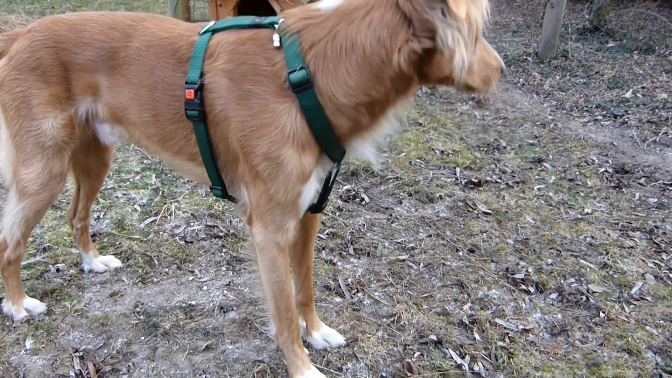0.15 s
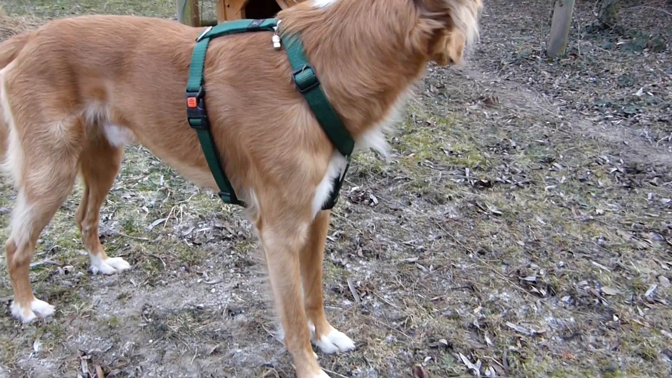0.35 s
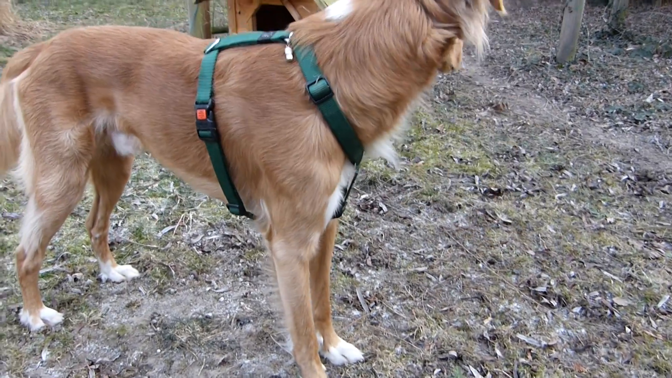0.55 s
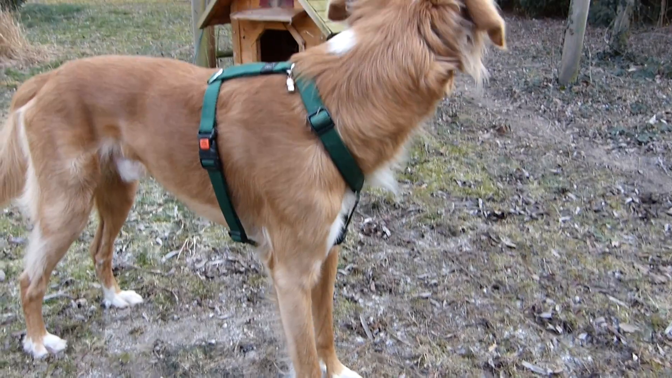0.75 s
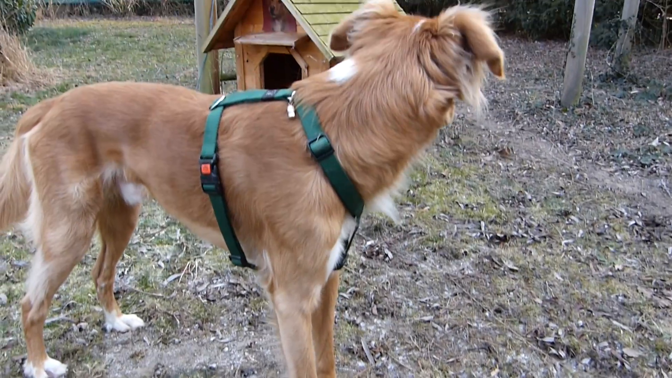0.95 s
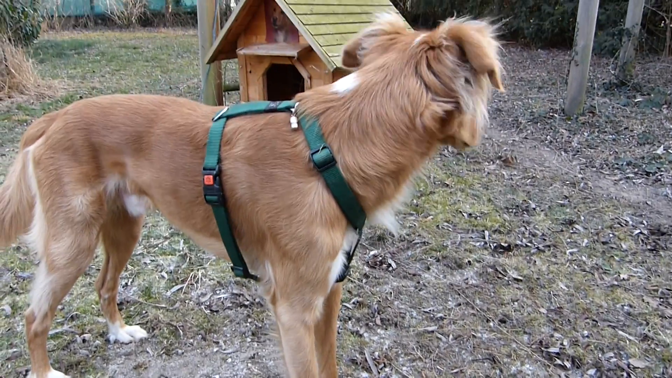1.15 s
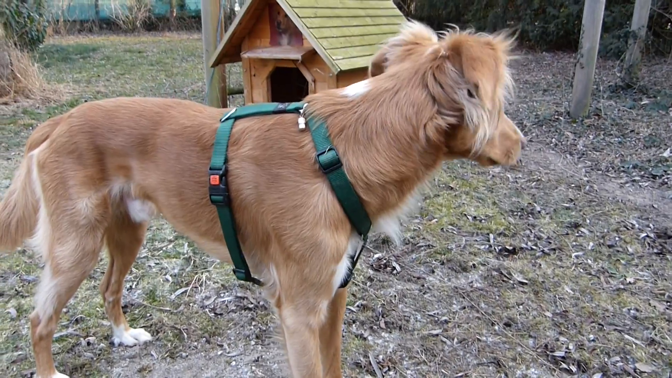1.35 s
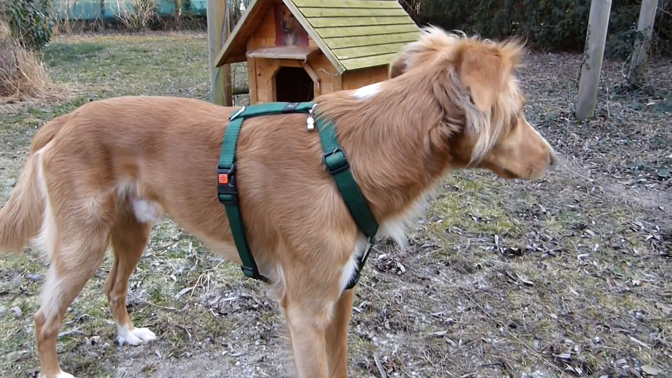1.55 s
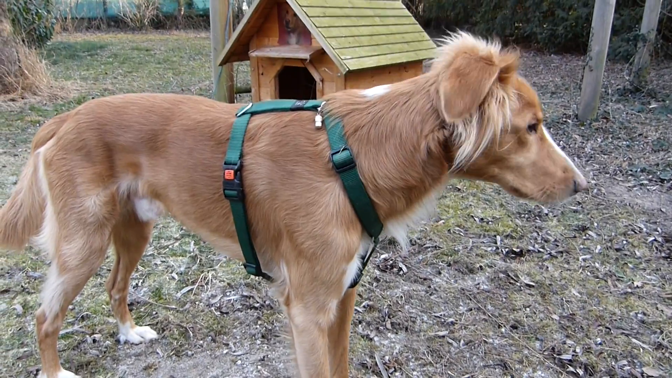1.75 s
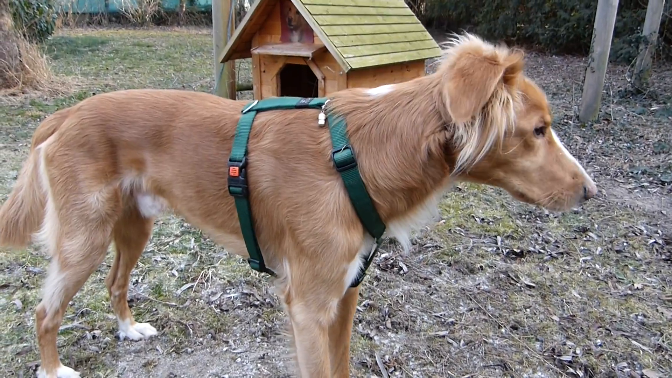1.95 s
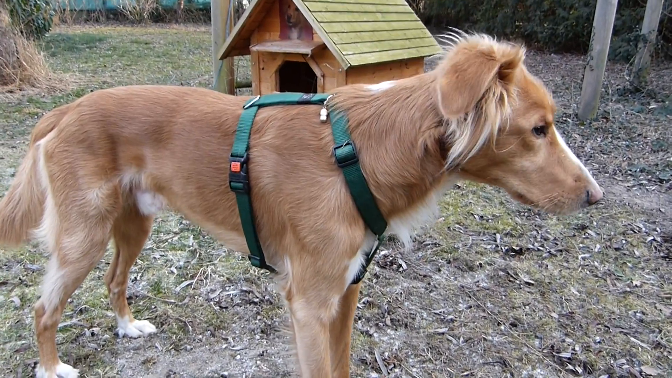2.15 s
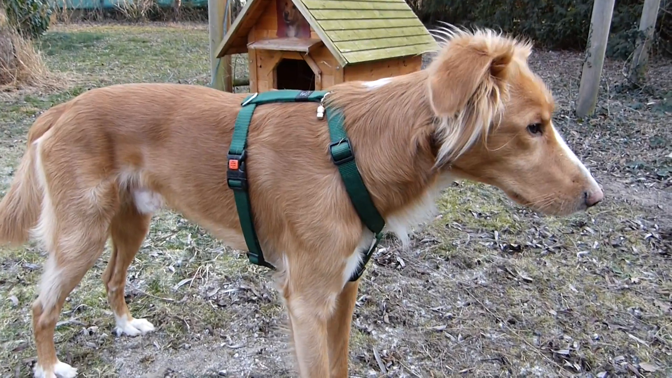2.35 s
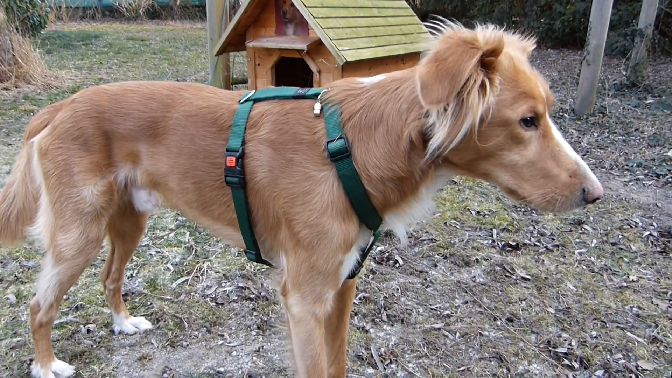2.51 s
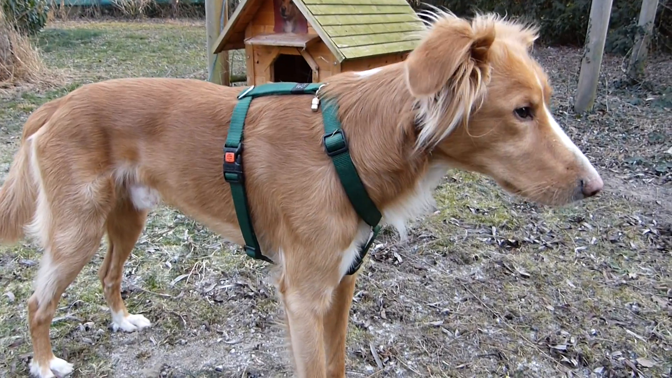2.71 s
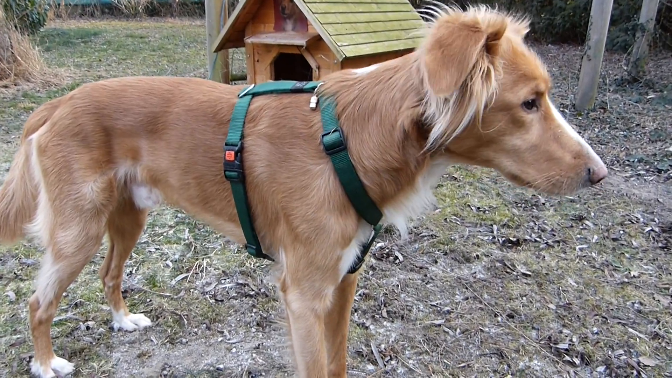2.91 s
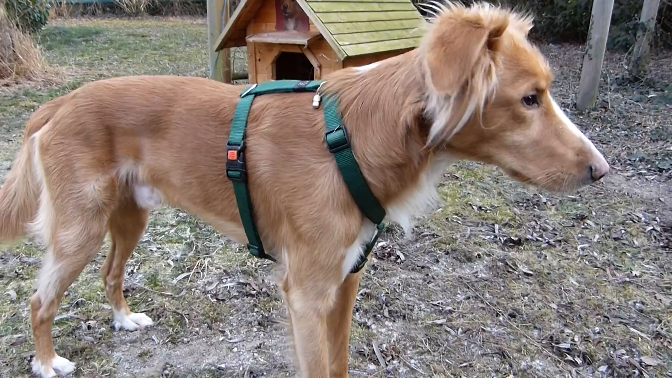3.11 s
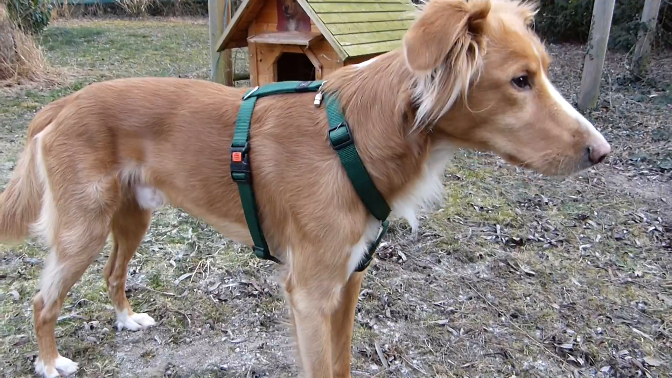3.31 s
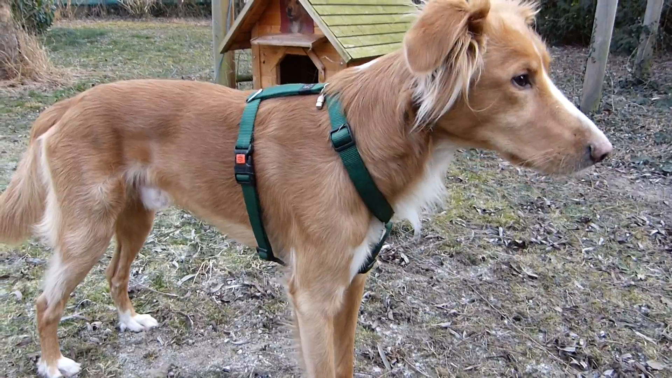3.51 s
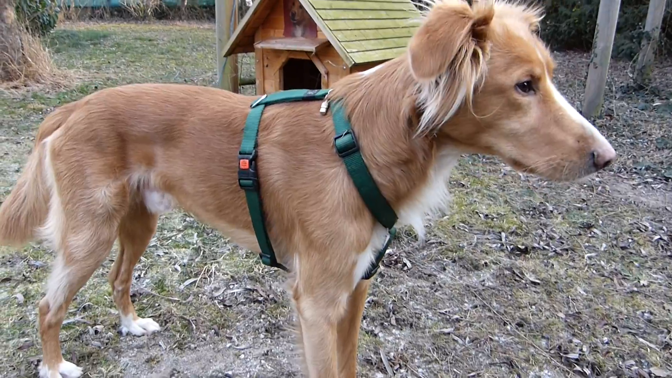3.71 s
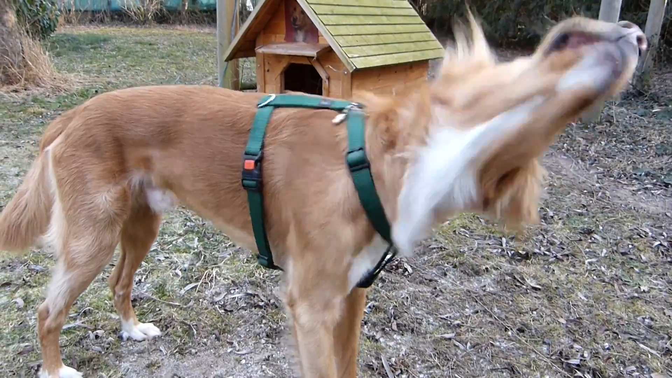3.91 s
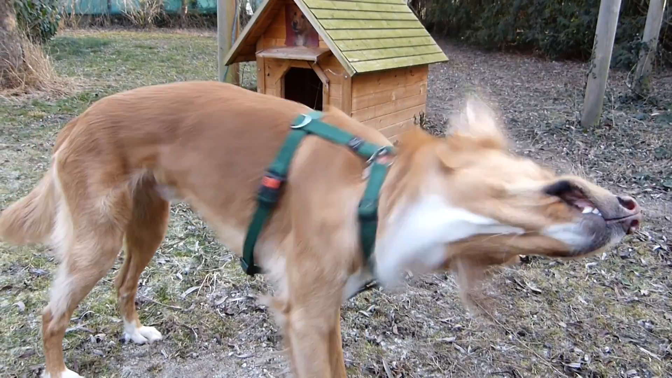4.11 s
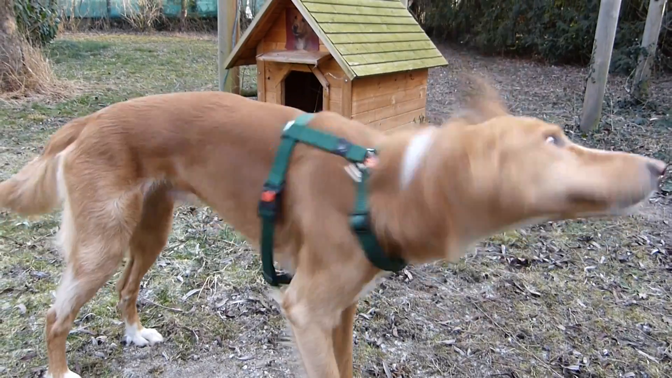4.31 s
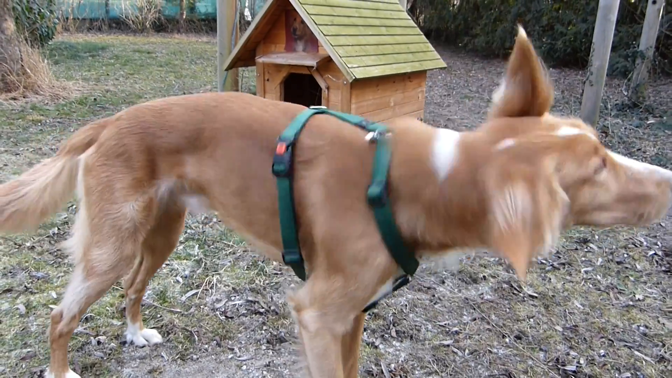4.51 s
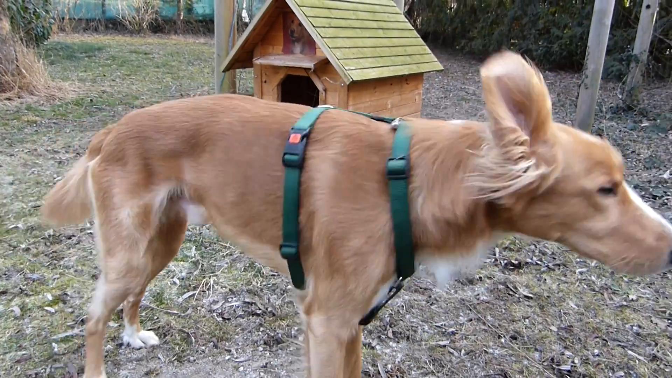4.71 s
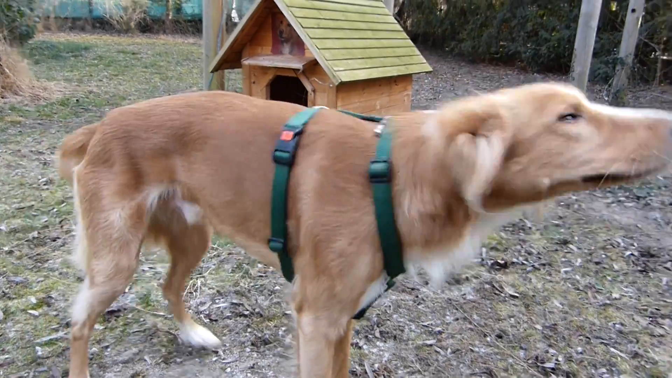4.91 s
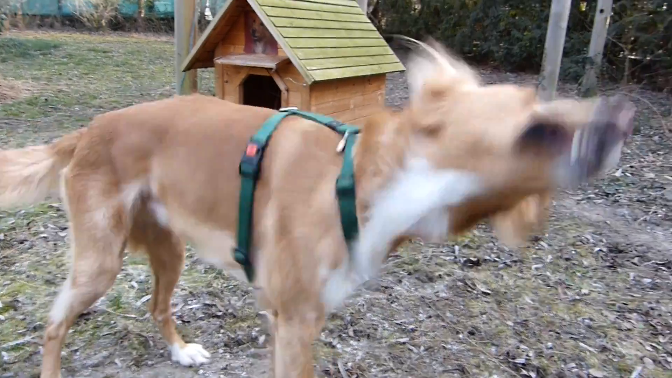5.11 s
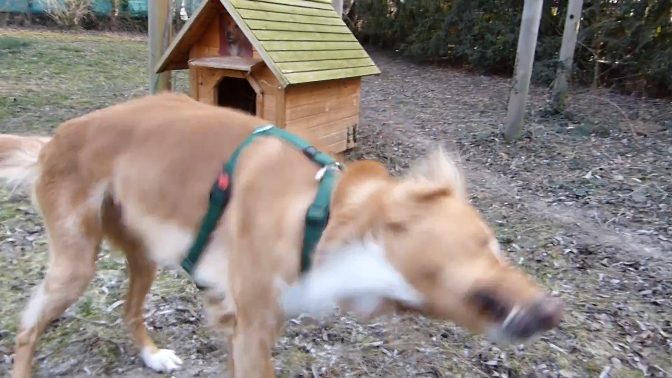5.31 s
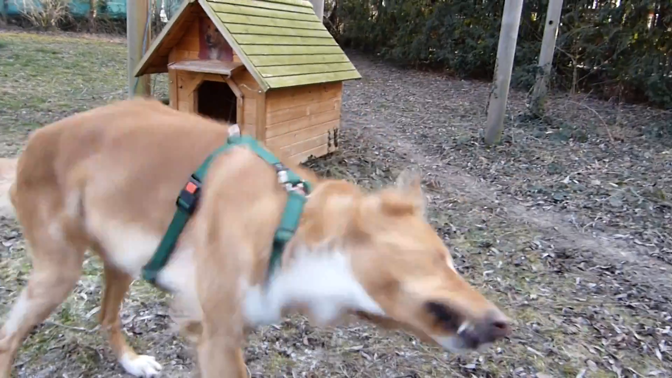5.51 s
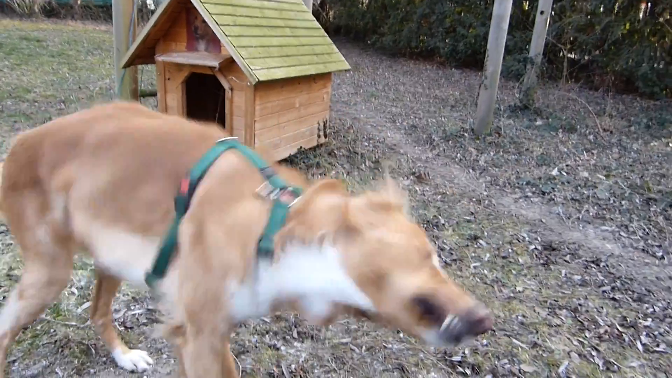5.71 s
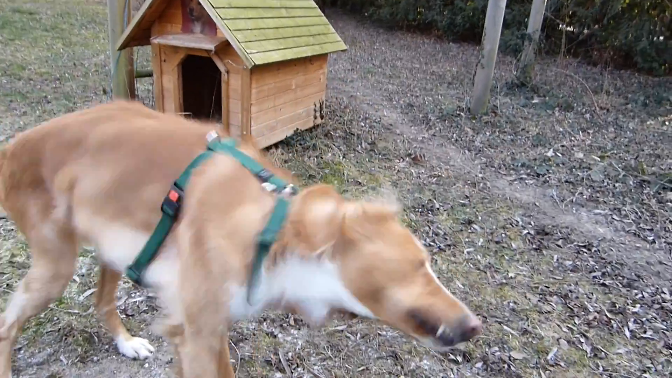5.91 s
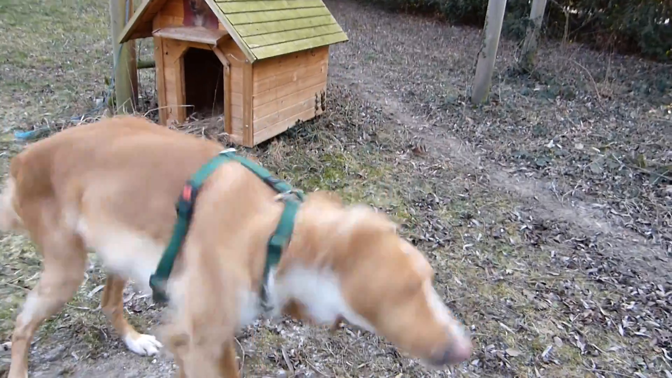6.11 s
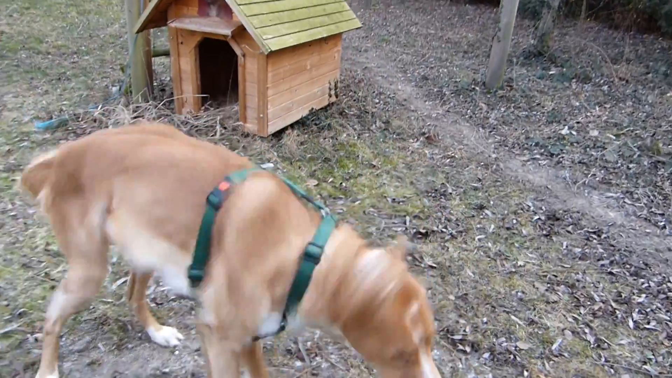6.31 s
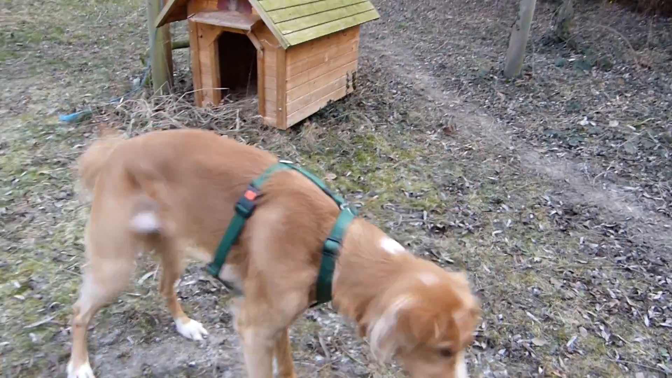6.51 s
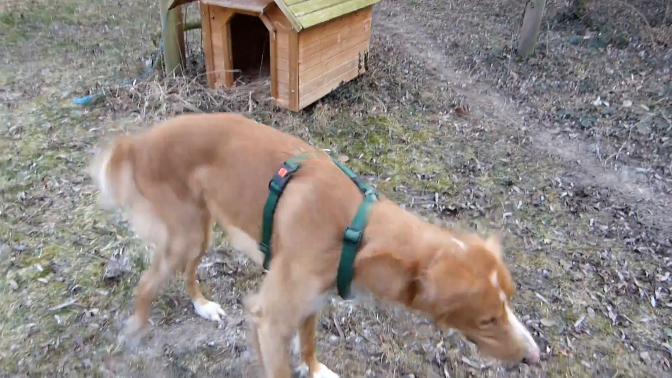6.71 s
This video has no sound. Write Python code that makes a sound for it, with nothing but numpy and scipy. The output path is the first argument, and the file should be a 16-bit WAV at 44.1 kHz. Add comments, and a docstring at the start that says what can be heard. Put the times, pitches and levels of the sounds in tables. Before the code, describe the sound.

A dog's ears flap in rapid leathery slaps, first a short burst, then a longer one with swishing coat, steel jingle, clicks and soft paw thuds.

```python
"""Far traffic murmurs behind a garden, and a hand rubs on a hard case: tiny slips excite its resonances.
Then a harnessed dog shakes its head briefly, and after a pause its whole body, its coat swishing as noise.
Its ears slap as damped air modes, about ten a second in the long shake, each with a thump, pop and crack.
The steel leash ring jingles as struck decaying modes, and the buckles click as short resonant noise.
Paws land on the earth as soft low thuds near the end."""
import sys
import numpy as np
from scipy import signal
from scipy.fft import rfft, irfft
from scipy.io import wavfile
from scipy.ndimage import uniform_filter1d

SR = 44100
rng = np.random.default_rng(int(sys.argv[2]) if len(sys.argv) > 2 else 0)


def wav_record(signal):
    """Record a signal, one row per channel, as 16-bit PCM in the file named by sys.argv[1]."""
    frames = np.transpose(np.atleast_2d(signal))
    bounded = np.clip(frames, -1, 1)
    # unit amplitude maps onto the largest positive 16-bit level
    quanta = np.round(bounded * 32767).astype(np.int16)
    wavfile.write(sys.argv[1], SR, quanta)


N = 297807
T = np.arange(N) / SR  # time in s
CREST_S = .014  # delay from the start of a noise burst to its crest
EDGE_HZ = 16000  # upper band limit

# Garden background. Each row: time in seconds, level in dB.
GARDEN_LEVEL = [(0, -55.5), (2.2, -56), (2.9, -58.5), (3.8, -55.5), (6.75, -55)]
# Spectrum of the garden air. Each row: frequency in Hz, relative level in dB.
GARDEN_SPECTRUM = [(25, -23), (100, -11.5), (140, -9), (220, -10), (350, -9.5), (530, -8), (800, -2.5),
                   (1100, -4.5), (1650, -9.5), (2400, -17), (3300, -19), (6900, -15), (16000, -34.5)]
# Stereo widths of garden, case and coat. Each row: frequency in Hz, side over middle in dB.
GARDEN_WIDTH = [(100, -9.5), (300, 5), (700, 1.5), (2500, -2), (6000, -5.5)]
CASE_WIDTH = [(70, -3), (300, 29), (900, 7.5), (1700, -7), (4000, -1.5)]
COAT_WIDTH = [(100, -23), (300, -14), (1000, -8), (10000, -9.5)]

# Strokes of the hand on the case. Each row: start in seconds, end in seconds, relative level in dB.
RUBS = [(0.226, 0.34, -53), (0.648, 0.978, -55), (0.933, 1.046, -50), (1.062, 1.088, -55),
        (1.245, 1.298, -58), (1.312, 1.363, -46.5), (1.593, 1.8, -49), (1.818, 1.922, -48),
        (2.025, 2.168, -47.5), (2.15, 2.222, -47)]
# Resonances of the case. Each row: frequency in Hz, relative level in dB.
CASE_SPECTRUM = [(150, -15), (520, -8), (760, 5.5), (1100, 2), (1550, -9), (1880, 2), (2250, -4.5),
                 (2850, -1), (3600, -6.5), (5100, -3), (6200, -5.5), (7100, -2), (10000, -17), (16000, -36)]
# Thin hisses of the hand. Each row: start in seconds, end in seconds, level in dB, resonance in Hz.
THIN_HISSES = [(0.67, 1.054, -59, 7260), (2.036, 2.238, -50.5, 5060)]

# Dry clicks of buckles and fittings. Each row: crest in seconds, level in dB, resonance in Hz.
CLICKS = [(3.8922, -54.5, 3830), (4.0545, -43, 4770), (4.135, -39, 8550), (4.244, -42, 4060),
          (4.494, -41, 3660), (5.3923, -34, 3120), (5.7148, -41, 7400), (5.7275, -23, 11100),
          (6.349, -31, 4220), (6.416, -36, 8850), (6.5073, -36.5, 5140), (6.559, -25, 6700),
          (6.633, -22, 9300), (6.694, -34, 5960)]

# The dog's shakes. Each row: start in seconds, wind-up in seconds, end in seconds,
# relative vigour in dB, tiring in dB per second.
SHAKES = [(3.979, 0.017, 4.82, -50, 14.5), (5.1, 0.14, 6.75, -45.5, 2)]
STOP_S = .06  # decay time as a shake comes to rest
# The body rolls to and fro, flinging the ring once a roll and swishing the coat twice.
ROLL_HZ, FLING_AT_S = 6.7, 5.605
# Single sweeps of hair and webbing. Each row: crest in seconds, level in dB, fade in seconds.
BRUSHES = [(4.76, -58, 0.054), (5.074, -45, 0.041), (6.635, -38, .04)]
# Spectra of the hair and of the duller body rustle. Each row: frequency in Hz, relative level in dB.
FUR_SPECTRUM = [(500, -51), (2000, -27), (3000, 1), (5000, 8.5), (8000, 9), (10000, 4.5), (12000, -5),
                (16000, -16)]
BODY_SPECTRUM = [(40, -34), (130, 0.5), (300, -4), (750, 2), (1500, 2), (2100, -2.5), (3200, -13),
                 (6000, -55)]

# Ear slaps. Each row: landing in seconds, force in dB, extra weight of the flap in dB,
# extra snap of its tip in dB, thump resonance in Hz.
SLAPS = [(4.0631, -39, 3, 3, 414), (4.1182, -46.5, 2, 7, 428), (4.1475, -18, 3, 3.5, 844),
         (4.16, -36, -1, -7, 693), (4.253, -31, 2, -3, 540), (4.39, -26, 3.5, -3.5, 736),
         (4.5129, -46.5, -3.5, -2, 350), (4.7663, -49, -12, -3, 700), (5.1576, -37.5, -4.5, -1, 685),
         (5.25, -37.5, -2, 2, 334), (5.345, -19, -4, 1.5, 430), (5.4384, -28, -2.5, 1.5, 470),
         (5.538, -20.5, -0.5, 1.5, 467), (5.611, -29.5, -10.5, 3, 930), (5.6382, -28.5, 1.5, -1, 547),
         (5.738, -19, 1.5, -3, 590), (5.8374, -29.5, 0.5, 1, 590), (5.9362, -20, 0, -0.5, 620),
         (6.002, -27.5, -12.5, -10, 800), (6.034, -30.5, -5.5, -8, 566), (6.129, -20.5, -0.5, 3, 590),
         (6.2226, -33.5, -5, 2, 600), (6.3182, -18, -2, 1, 586), (6.4146, -44.5, 4, 3, 700)]
# Pitch of the trapped air, which tends to rise as the head drops. Each row: time in seconds, frequency in Hz.
POP_PITCH = [(4.4, 1460), (5.3, 1460), (5.55, 1680), (6.05, 1580), (6.3, 1820)]
# Spectra of thump and crack. Each row: frequency in Hz, relative level in dB.
THUMP_SPECTRUM = [(30, -52), (80, -21), (160, 0), (500, -2.5), (950, 3.5), (1200, -19), (1800, -31),
                  (5000, -67.5)]
CRACK_SPECTRUM = [(800, -31), (2000, -16), (2750, 10.5), (3600, 4.5), (5000, 5.5), (8000, -6.5),
                  (11000, -11.5), (16000, -32)]
# Force of a middling slap; its thump and crack levels, and their growth in dB per dB of force.
USUAL_DB, THUMP_DB, THUMP_GROWTH, CRACK_DB, CRACK_GROWTH = -29, -31, .65, -40.5, 1.1
CRUMPLE = 0.54  # weak slaps slide on: dB more wrinkling for each dB less force

# Blows on the leash ring. Each row: start in seconds, force in dB,
# angle in degrees (0 rings the low modes, 90 the middle ones).
CLINKS = [(4.166, -37.5, 10), (4.213, -38.5, 5.1), (4.23, -41, 4), (4.4281, -38, 12), (4.4366, -37.5, 12),
          (4.45, -38.5, 13), (5.2657, -44.5, 60), (5.4875, -42.5, 50), (5.542, -39, 92), (5.5727, -29, 7.8),
          (5.5895, -27.5, 15), (5.601, -26, 74), (5.6423, -36.5, 35), (5.654, -36.5, 64), (5.806, -33, 16),
          (5.8118, -30, 68), (5.8667, -38.5, 18), (5.9912, -27.5, 4.3), (6.003, -31.5, 13),
          (6.0065, -28, 60), (6.173, -35.5, 16), (6.197, -28.5, 96), (6.1999, -30.5, 34),
          (6.387, -26.5, 75), (6.402, -37.5, 35)]
# Modes of the free ring before random scatter. Each row: group (0 low, 1 middle, 2 high),
# frequency in Hz, relative level in dB, time to fall by 60 dB in seconds.
RING_MODES = [(0, 3956, 3, .06), (0, 4066, 3, 0.092), (1, 6445, -14, 0.062), (1, 6650, -8, 0.025),
              (2, 7480, -6.5, .022), (2, 8460, 1.5, 0.039), (2, 9975, -3.5, .05), (2, 10300, -8.5, .025),
              (2, 15050, -22, 0.042)]
# Spectrum of scraping steel. Each row: frequency in Hz, relative level in dB.
STEEL_SPECTRUM = [(800, -19), (2500, -1), (5000, 1), (10300, 2.5), (12000, -14), (16000, -18)]
# A light touch rings mostly the high modes; deeper ones match them at FIRM_DB, growing in dB per dB.
FIRM_DB, DEEP_GROWTH = -33, 1.51
SCRAPE_GROWTH = .17  # light touches scrape: exponential lengthening of the onset per dB less force

# Soft paw falls. Each row: start of the swell in seconds, level in dB.
PAWS = [(6.515, -40), (6.595, -41.5), (6.724, -40.5), (6.738, -45)]


def amp(db):
    """The decibel law: amplitude grows tenfold in 20 dB."""
    return 10 ** (np.asarray(db) / 20)


def evened(x):
    """Normalises mean power, so that rms is 1."""
    return x / np.sqrt(np.mean(x ** 2) + 1e-20)


def blow(x):
    """Normalises impact energy to that of 10 ms at rms 1."""
    return x / np.sqrt(np.sum(x ** 2) / (SR / 100) + 1e-20)


def read(points, hz):
    """Interpolates a curve over log frequency, as hearing spaces pitch."""
    f, value = np.transpose(points)
    return np.interp(np.log(hz + 1), np.log(f + 1), value)


def add(mix, s, sound):
    """Superposition: adds a sound to the mix from time s."""
    part = mix[max(round(s * SR), 0):][:len(sound)]
    part += sound[:len(part)]


def colour(x, points):
    """Linear filtering: multiplies the spectrum of x by a gain curve."""
    size = x.shape[-1]
    gain = amp(read(points, np.fft.rfftfreq(size, 1 / SR)))
    return irfft(rfft(x) * gain, size)


def burst(rise, fall, size=2048):
    """Transient friction: noise swells exponentially to a crest at CREST_S and dies away."""
    t = np.arange(size) / SR - CREST_S
    return rng.standard_normal(size) * np.exp(np.minimum(t / rise, -t / fall))


def grains(per_s, spread_db):
    """Shot noise: random tiny contacts of uneven size and either sign."""
    size = amp(spread_db * np.minimum(rng.exponential(1, N), 4))
    return size * rng.choice([-1, 1], N) * (rng.random(N) < per_s / SR)


def clumps(depth_db, span_s):
    """Stick and slip: gain flutters at random as tufts and patches catch and let go."""
    wander = evened(uniform_filter1d(rng.standard_normal(N), max(round(span_s * SR), 1)))
    return evened(amp(depth_db * np.clip(wander, -2, 2)))


def air_mode(hz, width_hz, size=1024):
    """Damped resonance: bandwidth sets the decay; differencing removes the steady part."""
    t = np.arange(size) / SR
    swing = np.exp(-np.pi * width_hz * t) * np.sin(2 * np.pi * hz * t)
    return np.diff(swing, prepend=0)


def stereo(x, right_db):
    """Level panning: splits a level difference evenly between left and right."""
    return x * amp(np.array([[-.5], [.5]]) * right_db)


def widen(middle, other, width):
    """Decorrelation: an unrelated like sound enters left and right with opposite signs."""
    return middle + colour(other, width) * np.array([[1], [-1]])


def garden():
    """Diffuse field: far traffic and faint hiss as wide coloured noise of slowly drifting level."""
    middle, other = evened(colour(rng.standard_normal((2, N)), GARDEN_SPECTRUM))
    air = widen(middle, other, GARDEN_WIDTH)
    return air * amp(np.interp(T, *np.transpose(GARDEN_LEVEL)))


def hand(arch=0.83, crest=0.41, case_db=2.5, hiss_width_hz=450):
    """Sliding friction: uneven strokes of skin make tiny slips that excite the case's resonances."""
    def stroke(start, end, db):
        """Level follows the arched speed of one stroke; crest is its fraction of the duration."""
        phase = np.interp(T, [start, start + crest * (end - start), end], [0, .5, 1])
        return amp(db) * abs(np.sin(np.pi * phase)) ** arch

    speed = np.sqrt(sum(stroke(*row) ** 2 for row in RUBS))
    speed = speed * clumps(depth_db=1.46, span_s=0.0064)
    middle, other = (speed * evened(colour(grains(9000, 4.0), CASE_SPECTRUM)) for _ in range(2))
    hiss = np.zeros(N)
    for start, end, db, hz in THIN_HISSES:
        slips = signal.oaconvolve(grains(10000, 3.1), air_mode(hz, hiss_width_hz))[:N]
        hiss += stroke(start, end, db) * evened(slips)
    return amp(case_db) * widen(middle, other, CASE_WIDTH) + hiss


def buckles(peak_db=8):
    """Impact of small stiff parts: short noise clicks, each with one broad resonance."""
    out = np.zeros(N)
    for s, db, hz in CLICKS:
        click = colour(burst(0.00061, 0.0022),
                       [(300, -14), (1500, -22), (4000, 4.5), (9500, 5), (12000, -16), (16000, -20)])
        click = colour(click, [(hz * 0.74, 0), (hz, peak_db), (hz * 1.5, 0)])
        add(out, s - CREST_S, amp(db) * blow(click))
    return stereo(out, right_db=0.5)


def vigour():
    """Driven motion: each shake winds up, tires exponentially and comes to rest."""
    out = np.zeros(N)
    for start, wind_up, end, db, tiring in SHAKES:
        age = np.maximum(T - start, 0)
        rise = 1 - np.exp(-age / wind_up)
        stop = np.exp(-np.maximum(T - end, 0) / STOP_S)
        out += amp(db - tiring * age) * rise * stop
    return out


def coat(swish_db=1.3, chatter_db=-4, fling_db=4, body_db=-12, body_follows=0.77,
         swing_db=1.0, swish_lag_s=0.027, brush_rise_s=.004, travel_s=0.044):
    """Friction of hair on hair and webbing swells twice a roll; the ring chatters at each fling."""
    motion = vigour()
    roll = 2 * np.pi * ROLL_HZ * (T - FLING_AT_S)
    lag = 2 * np.pi * ROLL_HZ * swish_lag_s
    swish = motion * amp(swish_db + swing_db * np.cos(2 * (roll - lag)))
    for s, db, fade in BRUSHES:
        swish = swish + amp(db) * np.exp(np.minimum((T - s) / brush_rise_s, (s - T) / fade))
    # the shake travels from head to trunk
    body = amp(body_db) * np.interp(T - travel_s, T, motion) ** body_follows
    chatter = motion * amp(chatter_db + fling_db * np.cos(roll)) * rattle()

    def rustle():
        """Many tiny contacts add up to noise: bright hair over a duller body."""
        hair = evened(colour(grains(5500, 4.7), FUR_SPECTRUM)) * clumps(depth_db=2.5, span_s=0.012)
        return swish * hair + body * evened(colour(grains(3000, 3.1), BODY_SPECTRUM))

    return widen(rustle() + chatter, rustle(), COAT_WIDTH)


def ears(pop_width_hz=430, thump_width_hz=290, wrinkle=0.58, settle_db=-17, edge_db=-6):
    """Impact excites resonance: an ear lands edge first, with thump, pop and crack; harder is brighter."""
    low, middle, high = np.zeros((3, N))
    for s, force_db, weight_db, snap_db, thump_hz in SLAPS:
        harder_db = force_db - USUAL_DB
        contact = wrinkle * amp(-CRUMPLE * harder_db) * blow(burst(0.0024, 0.004))
        contact = contact + amp(settle_db) * blow(burst(0.0034, 0.01))  # the flap settles
        landing = blow(np.ones(1))
        add(contact, CREST_S, landing)
        edge_lead_s = rng.uniform(0.00076, 0.001855)
        add(contact, CREST_S - edge_lead_s, amp(edge_db) * landing)

        flesh = air_mode(thump_hz, thump_width_hz)  # the flap against the cheek
        pocket = air_mode(np.interp(s, *np.transpose(POP_PITCH)), pop_width_hz)  # trapped air
        thump = colour(signal.fftconvolve(contact, flesh), THUMP_SPECTRUM)
        pop = colour(signal.fftconvolve(contact, pocket), [(2000, 3.5), (2900, -4), (9000, -51)])
        crack = colour(burst(0.001, 0.0019), CRACK_SPECTRUM)  # hair

        thump_db = THUMP_DB + THUMP_GROWTH * harder_db + weight_db
        crack_db = CRACK_DB + CRACK_GROWTH * harder_db + snap_db
        add(low, s - CREST_S, amp(thump_db) * blow(thump))
        add(middle, s - CREST_S, amp(force_db) * blow(pop))
        add(high, s - CREST_S, amp(crack_db) * blow(crack))
    return stereo(low, right_db=3.0) + stereo(middle, right_db=2.5) + high


def ringing(group, size=4096, bend=0.009):
    """Modal decay: a random striking spot scatters levels, and the pull of the webbing bends pitches."""
    t = np.arange(size) / SR
    out = np.zeros(size)
    for g, hz, db, t60 in RING_MODES:
        if round(g) == group:
            level = amp(db + 4.6 * rng.standard_normal() - 60 * t / t60)
            out += level * np.sin(2 * np.pi * (hz * rng.normal(1, bend) * t + rng.random()))
    return out


def rattle(scrape_db=-5):
    """Repeated light impacts of steel on steel excite the modes a little, over a scraping noise."""
    touches = np.zeros(N)
    for group in (0, 0, 1, 2, 2, 2, 2):  # mostly high modes
        touches += signal.oaconvolve(grains(38, 5), evened(ringing(group, bend=.014)))[:N]
    scrape = evened(colour(grains(2500, 6), STEEL_SPECTRUM))
    return evened(evened(touches) + amp(scrape_db) * scrape)


def leash_ring(tick_db=-6, high_db=0.0, damped_db=-4, damped_s=0.0019, onset_s=0.00012,
               rattle_db=-11, rattle_s=0.012, loose_growth=0.6):
    """Damped modal impact: a scraping tick, modes held back by the webbing, and loose rattling around."""
    out, loose = np.zeros(N), np.zeros(N)
    t = np.arange(4096) / SR
    for s, force_db, angle in CLINKS:
        harder_db, turn = force_db - FIRM_DB, np.radians(angle)
        onset = 1 - np.exp(-t / onset_s * np.exp(SCRAPE_GROWTH * harder_db))
        hold = (amp(damped_db) + np.exp(-t / damped_s)) * onset
        deep = amp(FIRM_DB + DEEP_GROWTH * harder_db)
        gains = [deep * np.cos(turn), deep * np.sin(turn), amp(force_db + high_db)]
        for group, gain in enumerate(gains):
            add(out, s, gain * blow(hold * ringing(group)))
        tick = colour(burst(0.00048, 0.007), STEEL_SPECTRUM)
        add(out, s - CREST_S, amp(force_db + tick_db) * blow(tick))
        loose_db = FIRM_DB + loose_growth * harder_db + rattle_db
        loose += amp(loose_db) * np.exp(-abs(T - s) / rattle_s)
    return stereo(out + loose * rattle(), right_db=-1.0)


def paws(fall_s=0.004):
    """Soft impact: pads on yielding earth give low thuds with little treble."""
    out = np.zeros(N)
    for s, db in PAWS:
        thud = colour(burst(0.0068, fall_s), [(40, -30), (130, 2.5), (280, -1.5), (500, -1.5),
                                              (900, -3.5), (2000, -8.5), (6000, -50)])
        add(out, s, amp(db) * blow(thud))
    return stereo(out, right_db=-0.5)


def ground(x, scatter_db=-15, fade_s=0.0013, size=1024):
    """Scattering: flank and rough earth return a short tail, opposite in sign on the two sides."""
    t = np.arange(size) / SR
    taps = rng.standard_normal(size) * np.exp(-t / fade_s)
    tail = signal.oaconvolve(x.mean(axis=0), taps / np.linalg.norm(taps))[:N]
    return x + amp(scatter_db) * tail * np.array([[1], [-1]])


def scene():
    """Superposition: the hits with their scattering, then the softer sources."""
    hits = ground(ears() + leash_ring() + buckles())
    return hits + paws() + coat() + hand() + garden()


def record(dry):
    """Clipping at full scale, then a linear-phase low-pass at EDGE_HZ."""
    low_pass = signal.firwin(401, EDGE_HZ, window=("kaiser", 9), fs=SR)
    return signal.oaconvolve(np.clip(dry, -1, 1), low_pass[None], "same")


dry = scene()
out = record(dry)
wav_record(out)
```